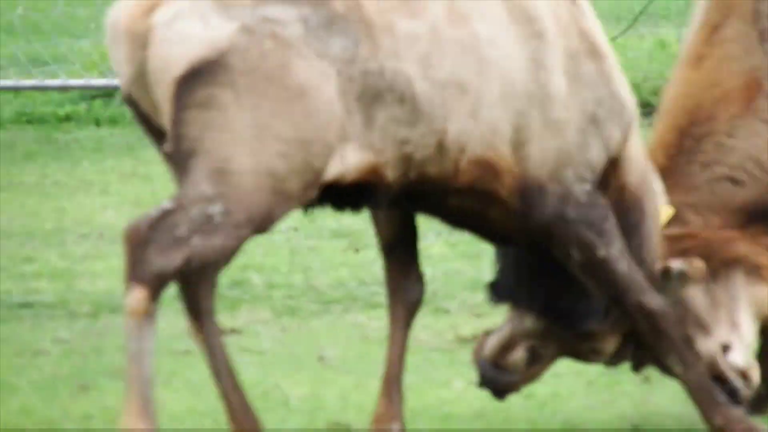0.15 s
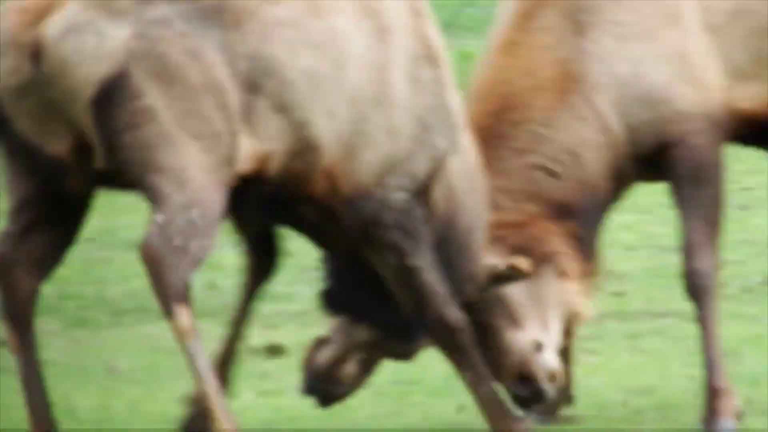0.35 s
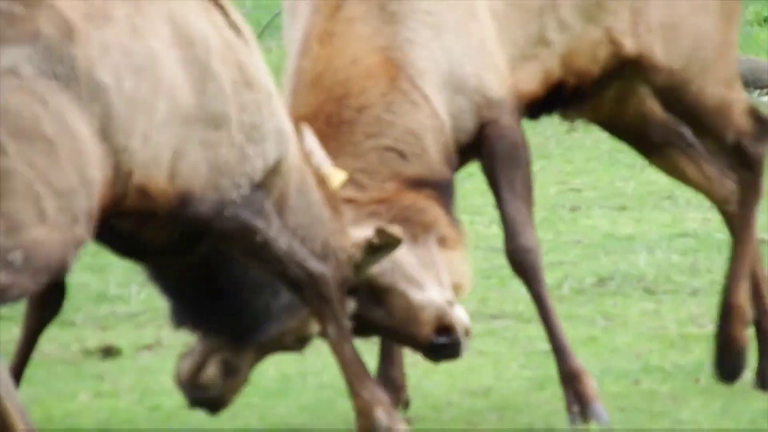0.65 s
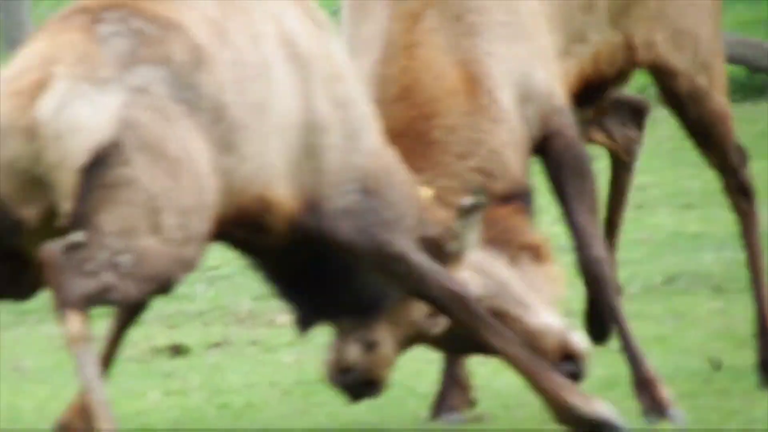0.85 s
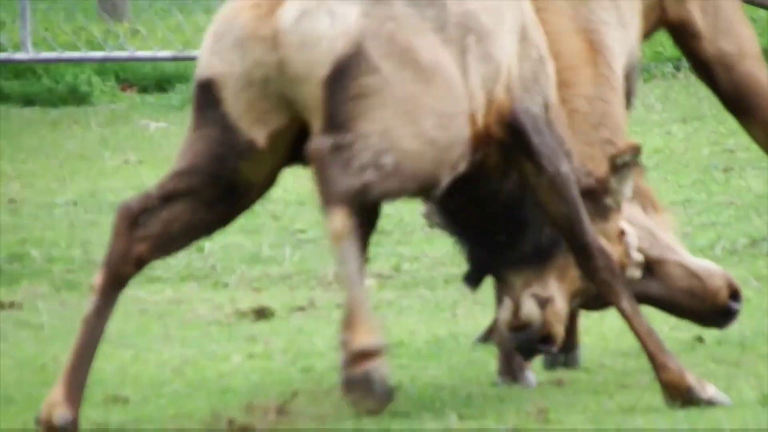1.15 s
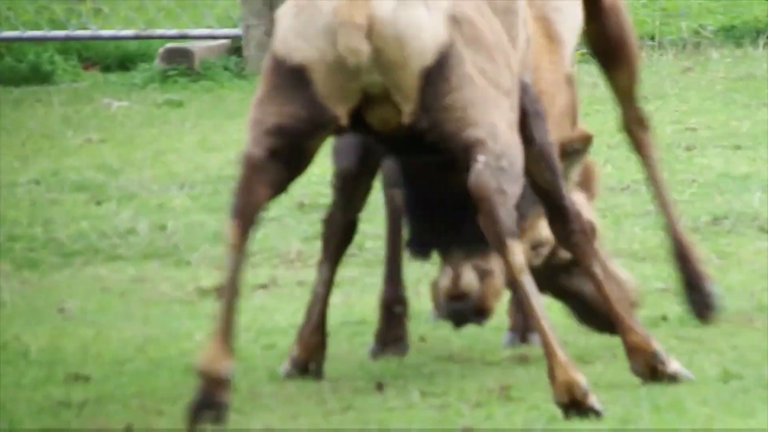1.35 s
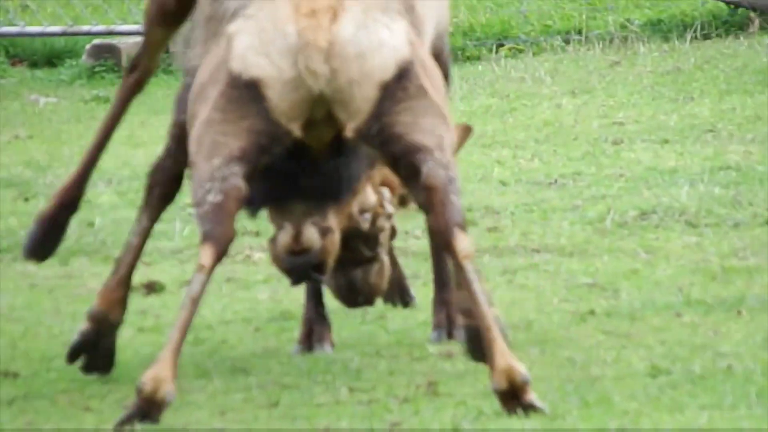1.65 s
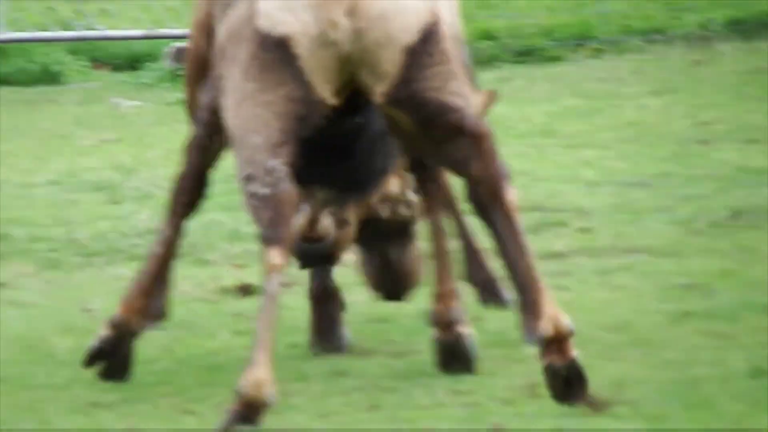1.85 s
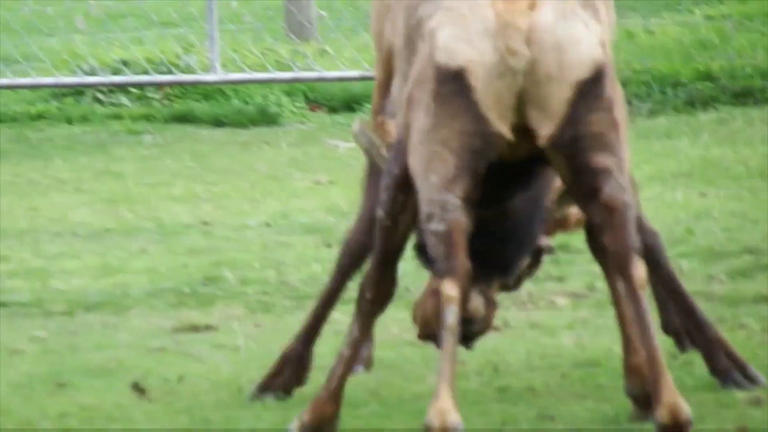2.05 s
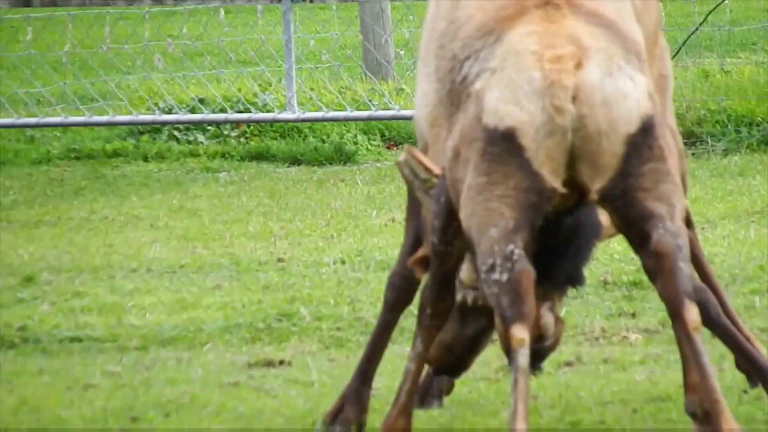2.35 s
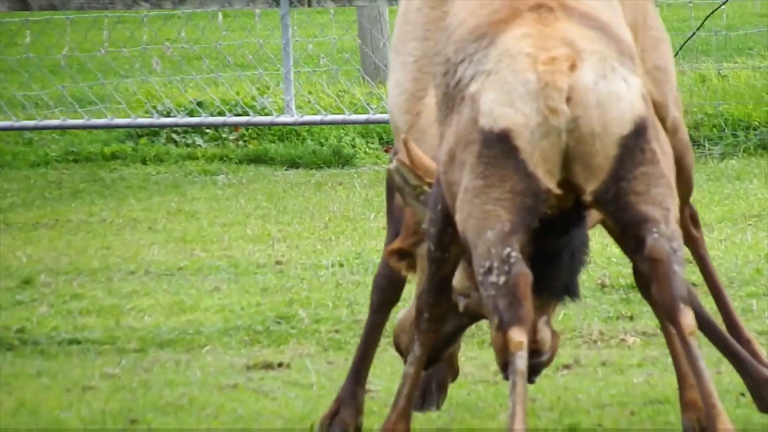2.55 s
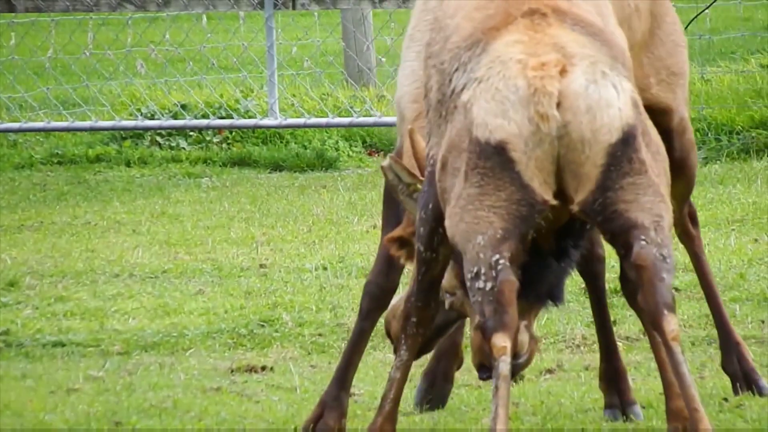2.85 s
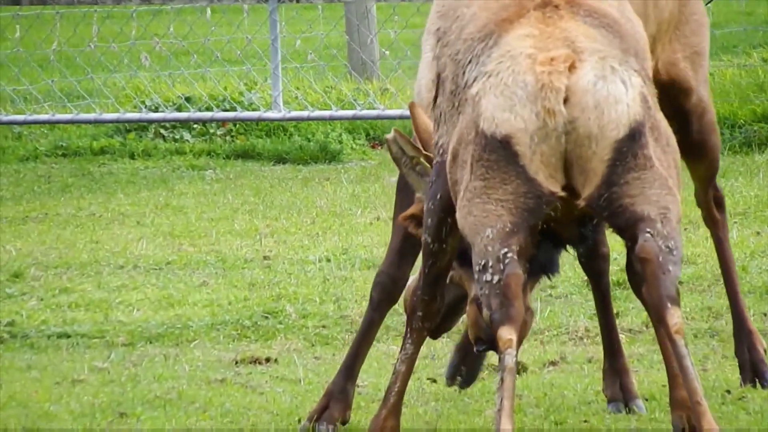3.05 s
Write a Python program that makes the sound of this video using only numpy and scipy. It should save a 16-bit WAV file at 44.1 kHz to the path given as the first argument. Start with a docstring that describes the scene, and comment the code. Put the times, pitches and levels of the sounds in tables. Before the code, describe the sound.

Irregular sharp, woody clacks of two young elk locking antlers, with brief rattles and scrapes, amid birdsong and soft mechanical ticking close by.

```python
"""Young elk locking antlers

Two young bull elk push with locked antlers in a paddock while small birds chirp in the trees.
Knocks and a clack are sets of ringing tones; scrapes, whirr and far-off twitter are shaped noise.
Bird calls are near-pure tones with moving pitch, followed by an echo. Light double ticks run over the whirr.
After a last sharp clack the ticking stops and the whirr turns thinner and faster."""
import sys
import numpy as np
from scipy import signal
from scipy.fft import rfft, irfft
from scipy.io import wavfile

SR = 44100
rng = np.random.default_rng(int(sys.argv[2]) if len(sys.argv) > 2 else 0)


def output_pcm(signal):
    """Save a mono or channel-first signal as 16-bit PCM at the path in sys.argv[1].

    Samples are clipped to [-1, 1] before scaling.
    """
    pcm = np.clip(np.atleast_2d(signal).T, -1, 1) * 32767
    wavfile.write(sys.argv[1], SR, np.round(pcm).astype(np.int16))


N = 278712
TIME = np.arange(N) / SR
BINS = np.fft.rfftfreq(N, 1 / SR)

# Level of the distant birds, which blur into a twitter: (time [s], level before a shared trim [dB])
TWITTER_LEVEL = [(0, -51.5), (0.42, -46), (1.0, -53.5), (1.65, -54.5), (1.92, -47), (2.15, -49),
                 (2.35, -54), (2.85, -52), (3.0, -49.5), (3.2, -48), (3.65, -52), (3.95, -57.5),
                 (4.3, -52.5), (4.55, -47), (4.85, -50), (6.32, -53.5)]
# Tone colour of that twitter: (frequency [Hz], relative level [dB])
TWITTER_COLOUR = [(1900, -30), (2400, -3), (2900, 2), (3400, 2), (3900, -6), (4500, -14), (6000, -34.5)]
# A faint far-off drone that comes and goes: (time [s], level [dB])
DRONE_LEVEL = [(0, -82), (0.15, -60), (0.35, -49.5), (0.6, -55.5), (0.95, -75), (2.8, -89), (3.1, -58),
               (3.6, -57.5), (4.0, -81), (6.32, -78)]
# Low hum bands: (frequency [Hz], width [Hz], level [dB])
HUM_BANDS = [(62.7, 4.6, -87.5), (167.8, 4.9, -79.5)]
# Tone colour of the steady hiss: (frequency [Hz], relative level [dB])
HISS_COLOUR = [(20, -6), (45, -13), (90, 10.5), (160, 11), (400, -6.5), (5000, 7.5), (9000, 4.5),
               (13000, 0.5), (16000, -6)]

# How alike the two sides of every noise are: (frequency [Hz], likeness [0 to 1])
SIDE_LIKENESS = [(60, 0.88), (110, 1), (200, 0.97), (380, 0.86), (700, 0.91), (1290, 0.95), (2380, 0.88),
                 (4400, 0.83), (8120, 0.65), (15000, 1)]
# Which side of the noise is louder: (frequency [Hz], left minus right [dB])
SIDE_LEAN = [(60, -1), (110, 0), (200, 1.5), (380, 1.5), (700, -1.5), (1290, 2), (2380, 0.5), (4400, 1),
             (8120, -1), (15000, 1)]
# How far the left side of the noise runs ahead: (frequency [Hz], phase lead [radians])
LEFT_LEAD = [(200, 0), (430, -0.22), (1000, 0.056), (3300, -0.014), (5500, 1), (8000, 0.12)]

# Tone colour of the whirr before the last clack: (frequency [Hz], relative level [dB])
SLOW_WHIRR_COLOUR = [(120, -34), (240, -10.5), (310, -7.5), (400, -2), (540, -9), (700, -1.5), (850, 0),
                     (1150, -8.5), (1550, -6.5), (1950, -10), (2500, -7), (3600, -30), (4600, -28),
                     (6500, -39)]
# Tone colour of the whirr after it: (frequency [Hz], relative level [dB])
FAST_WHIRR_COLOUR = [(120, -24.5), (250, -8), (350, -2), (560, -2.5), (740, -10), (1000, -1), (1170, -4),
                     (1340, 3.5), (1550, -6.5), (1750, 0), (2400, 3), (3500, -29), (4400, -14.5),
                     (6500, -21.5)]
# Thin whines above the fast whirr: (frequency [Hz], width [Hz], level [dB])
WHINES = [(6460, 350, -80), (7760, 410, -84), (10400, 1000, -74)]
SWITCH_S = 5.535  # when the whirr changes
# The loudest ticks: (time [s], level before a shared lift [dB])
LOUD_TICKS = [(0.613, -36.5), (0.844, -39.5), (1.18, -37), (1.3304, -35), (1.6636, -37.5), (1.8993, -37.5),
              (2.0313, -37), (2.264, -37), (2.348, -36.5), (3.6324, -39), (4.2323, -38.5), (4.5166, -33.5),
              (4.9167, -35), (5.119, -37)]
# What a tick rings with: (frequency [Hz], width [Hz], relative level [dB], right side's lead [radians])
TICK_MODES = [(409, 64, -2.5, -0.42), (720, 59, -1.5, 0.78), (975, 115, -3, 0.38), (1164, 77, -8, 0.54),
              (1423, 61, -2, 0.56), (1565, 54, -3, 1), (1877, 45, 4.5, -0.49), (2530, 250, -14.5, 0.49),
              (3264, 104, -6.5, -0.21), (3470, 99, -19, 0.58), (4150, 61, -9, -0.25),
              (4700, 280, -13, -1.9)]
STEP_HZ, FIRST_STEP_S = 59.94, 0.0122  # clock of the small motor that ticks

# A songbird repeats one phrase of arched notes:
# (time [s], length [s], top of the first arch [Hz], level of the first note [dB])
PHRASES = [(1.13, 0.17, 2950, -44.5), (1.696, 0.234, 3004, -42.5), (2.695, 0.26, 3067, -43),
           (3.449, 0.22, 2965, -41.5), (4.381, .255, 3110, -40), (5.155, 0.064, 3000, -39),
           (5.678, 0.2, 2966, -48.5)]
NOTE_S, NOTE_EVERY_S = 0.061, 0.07  # length and spacing of the notes in a phrase
ARCH_HZ = 475  # each note climbs this far to its top and falls back
NOTE_DROP_HZ, NOTE_FADE_DB = 65.5, -1.38  # each note is lower and softer than the one before
WARBLE_HZ, WARBLE_S = 290, 0.021  # opening warble of the later notes: depth, and time to settle
# Single sliding whistled notes, mostly from other birds; the one at 1.068 s is the songbird's lead note before
# its phrase: (time [s], length [s], start pitch [Hz], glide [Hz per s], warble depth [Hz], level [dB])
WHISTLES = [(0.105, .07, 2570, 6800, 5, -53), (0.418, 0.093, 3114, -2600, 35, -49.5),
            (1.019, 0.083, 3060, -1000, 5, -53.5), (1.068, 0.043, 2686, 800, 57, -46),
            (2.764, 0.057, 3436, -3600, 10, -45.5), (2.821, 0.123, 3366, -1800, 88, -49.5),
            (3.132, 0.043, 3436, -1700, 30, -44), (3.43, 0.029, 3350, -2200, 5, -44.5),
            (4.014, 0.084, 3085, -3800, 81, -48.5), (4.099, 0.047, 3650, -16000, 69, -50),
            (4.234, 0.046, 3290, -2400, 5, -47), (4.261, 0.066, 3085, -6600, 10, -48.5),
            (5.006, .059, 3380, -4500, 15, -46), (5.062, 0.103, 2925, -2100, 190, -45.5),
            (5.272, 0.034, 4260, -7500, 160, -58)]
# Short, high chips: (time [s], middle pitch [Hz], glide [Hz per s], level [dB])
CHIPS = [(1.057, 3630, -16000, -50), (1.06, 4800, -22000, -56), (1.662, 3650, 8000, -44),
         (2.455, 3580, 0, -54), (2.635, 3580, -30000, -51), (3.852, 3700, -5000, -48.5),
         (4.57, 3580, 0, -49), (5.332, 4480, 29992, -53.5)]
CHIP_S, CHIP_WARBLE_HZ = 0.0207, 50
# Fainter birds call at random times and pitches, each gliding up or down by a random amount
FAR_PER_S, FAR_DB, FAR_S = 4, -58.5, 0.054  # calls per second, level, length
FAR_LOW_HZ, FAR_HIGH_HZ = 2750, 3300
FAR_GLIDE_HZ_PER_S, FAR_WARBLE_HZ = 5930, 35  # largest glide, warble depth

# Rough sliding contacts around the knocks: (time [s], length [s], level at the start [dB])
SCRAPES = [(3.38, 0.027, -44), (5.006, 0.011, -35), (5.321, .15, -42.5), (5.547, 0.031, -43)]
# Tone colour of a scrape: (frequency [Hz], relative level [dB])
SCRAPE_COLOUR = [(88, -58), (150, -18), (396, -2), (726, -1), (1210, -11.5), (1600, -0.5), (2720, -6.5),
                 (3030, -33), (3320, -5.5), (5360, -22), (12000, -48), (15600, -74), (22000, -120)]
SCRAPE_RISE_S, SCRAPE_SAG_DB_PER_S, SCRAPE_RELEASE_S = 0.0035, -35, 0.0053

# Hard knocks and their rattles:
# (time [s], level [dB], brightness [dB per octave], left minus right [dB])
KNOCKS = [(3.2534, -11, -0.5, -2), (3.384, -29.5, -0.5, 6), (3.3859, -31.5, 1.5, 2), (3.3976, -29, 1.5, 0),
          (3.402, -27.5, 3, -6), (3.8087, -32, -0.5, -5), (3.8153, -39, -14, 2), (3.8235, -49, -2, -2),
          (4.0784, -21, -2, -1), (4.365, -17.5, -2, -4), (4.6098, -7.5, 1, -3), (5, -12, 2.5, -3.5),
          (5.0061, -28, 2, 14), (5.0088, -25, 9, 4), (5.0102, -26, 6, -4), (5.0156, -26, 2.5, 1),
          (5.5648, -27.5, -3, 1), (5.5701, -34.5, -7, -4), (5.58, -33.5, -18, 1)]
# What a knock rings with: (frequency [Hz], width [Hz], relative level [dB], right side's lead [radians])
BODY_MODES = [(190, 15, -8.5, -0.22), (263, 80, 2.5, -0.1), (344.5, 59, 6, -0.18), (403, 35, -3.5, -0.2),
              (515, 43, 4.5, -0.64), (706, 184, 5.5, 1.28), (899, 93, 3.5, 1.55), (1193, 33, -9.5, -0.12),
              (1344, 52, -1, -0.11), (1615, 41, 2, 1.8), (2030, 78, -7.5, 0.14), (2298, 123, 2.5, -1.64),
              (2665, 61, 2, -0.47), (2900, 140, -32, -0.4), (3380, 162, 0, -0.079), (3700, 210, -5, 1.2),
              (4110, 360, -25.5, 0.36), (4510, 120, -12, -1.5), (5270, 1700, -20, 1.8)]
# The quick contacts of the last, dry clack: (time [s], peak level [dB])
CLACKS = [(5.5305, -26), (5.537, -18), (5.5393, -28.5), (5.5411, -16.5), (5.5437, -35)]
# What that clack rings with: (frequency [Hz], width [Hz], relative level [dB], right side's lead [radians])
CLACK_MODES = [(398, 110, -12.5, 0.1), (1410, 200, -7, 0.99), (1850, 95, 3, 0.77), (2190, 135, 3.5, -0.72),
               (2660, 170, 2, -0.96), (3000, 160, -6, 0.94), (3225, 53, 7.5, 1.0), (4550, 140, -12, 0.93),
               (5150, 250, -24, -0.11), (6550, 290, -11, 1), (7770, 220, -20, 1), (10400, 1200, -37, 0)]

# Dips in the microphone's response: (frequency [Hz], width [Hz])
MIC_DIPS = [(220, 31), (1085, 90)]
EDGE_HZ = 15850  # top of the microphone's range


def amp(db):
    """Turns decibels into a plain multiplier."""
    return 10 ** (np.asarray(db) / 20)


def unit(x):
    """Scales a sound to an average (rms) strength of 1."""
    return x / np.sqrt(np.mean(x ** 2) + 1e-20)


def read(points, hz=BINS):
    """Reads between the rows of a frequency table, with octaves evenly spaced."""
    f, value = np.transpose(points)
    return np.interp(np.log(hz + 1), np.log(f + 1), value)


def level(rows):
    """Turns (time, dB) rows into a multiplier for every sample."""
    return amp(np.interp(TIME, *np.transpose(rows)))


def add(mix, s, sound):
    """Mixes a sound in at time s, cutting off what runs past the end."""
    part = mix[..., max(round(s * SR), 0):][..., :sound.shape[-1]]
    part += sound[..., :part.shape[-1]]


def drift(hz):
    """Smooth random motion of rms 1; a higher hz makes it quicker."""
    spectrum = rfft(rng.standard_normal(N))
    return unit(irfft(spectrum * np.exp(-(BINS / hz) ** 2), N))


def noise(colour_db, grain=1):
    """Stereo noise, roughened by a grain envelope and then given its tone colour."""
    first, second = rfft(rng.standard_normal((2, N)) * grain)
    same, lean = np.clip(read(SIDE_LIKENESS), -1, 1), read(SIDE_LEAN)
    # the right side is part shared noise, part its own, and lags by the left side's lead
    right = same * first + np.sqrt(1 - same ** 2) * second
    right = right * np.exp(-1j * read(LEFT_LEAD))
    sides = np.array([first * amp(lean / 2), right * amp(-lean / 2)])
    return unit(irfft(sides * amp(colour_db), N))


def hump(hz, width):
    """Tone colour in dB of a steep-sided resonance: strongest at hz, falling away on both sides."""
    return -20 * np.log10(1 + (2 * (BINS - hz) / width) ** 2)


def strike(modes, brightness_db, scatter_db, top_hz):
    """One blow: harder contact favours the high tones, and no two blows excite them alike."""
    t = np.arange(SR // 12) / SR
    out = np.zeros((2, len(t)))
    for k, (hz, width, db, lead) in enumerate(modes):
        size, detune = rng.standard_normal(2)
        octaves = np.log2(min(hz, 3500) / 700)
        gain = amp(db + brightness_db * octaves + scatter_db * size) * width
        side_phase = np.array([[-lead], [lead]]) / 2
        phase = 2 * np.pi * hz * (1 + 0.0011 * detune) * t + side_phase
        sign = (-1) ** (k // 2)
        # a wider resonance dies away sooner
        out += sign * gain * np.exp(-np.pi * width * t) * np.cos(phase)
    out = signal.lfilter(*signal.butter(2, 190, "high", fs=SR), out)
    # the contact takes a finite time, which softens the top
    out = signal.lfilter(*signal.butter(4, min(top_hz, 15000), fs=SR), out)
    return out / abs(out).max()


def echoes(x, t60):
    """Sparse, scattered reflections that die away by 60 dB in t60 seconds."""
    t = np.arange(SR) / SR
    hits = rng.standard_normal((3, SR)) * (rng.random((3, SR)) < 1500 / SR)
    taps = hits * amp(-60 * t / t60) * (t > 0.006)
    tail = taps[0] + 0.24 * taps[1:]  # mostly shared, partly different on each side
    return signal.fftconvolve(x, tail / np.linalg.norm(tail[0]), axes=1)[:, :N]


def background(twitter_db=-2, twitter_swing_db=1.5, hiss_db=-69):
    """Distant birds, a far drone, a low hum and an even hiss, all made of shaped noise."""
    swing = amp(twitter_db + twitter_swing_db * drift(25))
    twitter = swing * level(TWITTER_LEVEL) * noise(read(TWITTER_COLOUR))
    drone = level(DRONE_LEVEL) * noise(hump(1160, 330))
    hum = sum(amp(db) * noise(hump(hz, width)) for hz, width, db in HUM_BANDS)
    hiss = amp(hiss_db) * noise(read(HISS_COLOUR))
    return twitter + drone + hum + hiss


def whirr(slow_db=-51.5, fast_db=-50, flutter_hz=62, flutter_db=3, grain_db=2.0):
    """A grainy whirr that switches to a fast flutter with thin whines on top."""
    switched = np.clip((TIME - SWITCH_S) / 0.008, 0, 1)
    slow = amp(slow_db) * noise(read(SLOW_WHIRR_COLOUR), amp(grain_db * drift(108)))
    pace_hz = flutter_hz * (1 + 0.1944 * drift(31.6))
    flutter = amp(flutter_db * np.sin(2 * np.pi * np.cumsum(pace_hz) / SR))
    whine = sum(amp(db) * noise(hump(hz, width)) for hz, width, db in WHINES)
    fast_colour = read(FAST_WHIRR_COLOUR + [(11000, -45)])  # one more row keeps the treble falling
    fast = amp(fast_db) * noise(fast_colour, flutter) + whine
    return (1 - switched) * slow + switched * fast


def ticking(loud_db=1, small_db=-41, spread_db=3.0, rebound_s=0.004, slip_share=0.2):
    """Light double ticks on every second step of a motor's clock, now and then a step late."""
    out = np.zeros((2, N))
    slip, size = rng.random((190, 2)).T
    times = FIRST_STEP_S + np.cumsum(2 + (slip < slip_share)) / STEP_HZ
    sizes_db = small_db + spread_db * (3 * size - 2)
    small = [(s, db) for s, db in zip(times, sizes_db) if s < SWITCH_S]
    loud = [(s, db + loud_db) for s, db in LOUD_TICKS]
    for s, db in small + loud:
        for at in (s, s + rebound_s * rng.uniform(0.696, 1.3)):
            tick = strike(TICK_MODES, brightness_db=0.0, scatter_db=2.5, top_hz=5370)
            add(out, at, amp(db) * tick)
    return out


def whistle(hz, db):
    """A near-pure note that follows a pitch curve, with soft ends."""
    gate = signal.windows.tukey(len(hz), 0.15)
    return amp(db) * np.sqrt(2) * gate * np.sin(2 * np.pi * np.cumsum(hz) / SR)


def warble(t, rate_hz=62, uneven=0.314):
    """A quick, uneven shake of the pitch, between -1 and 1."""
    pace = np.interp(t, np.linspace(0, t[-1], num=8), rng.standard_normal(8))
    turns = np.cumsum(rate_hz * (1 + uneven * pace)) / SR
    return np.sin(2 * np.pi * (rng.random() + turns))


def glide(length, start_hz, hz_per_s, warble_hz, db):
    """A call that slides straight up or down and warbles on the way."""
    t = np.arange(round(length * SR)) / SR
    return whistle(start_hz + hz_per_s * t + warble_hz * warble(t), db)


def songbird(waver_hz=12, stop_s=0.0019):
    """Each phrase is one clean arch, then warbled arches that sink and fade until the bird breaks off."""
    out, t = np.zeros(N), np.arange(round(NOTE_S * SR)) / SR
    arch = -ARCH_HZ * (2 * t / NOTE_S - 1) ** 2
    for s, length, top_hz, db in PHRASES:
        for k in range(4):
            start = k * NOTE_EVERY_S
            depth = waver_hz + (k > 0) * WARBLE_HZ * np.exp(-(t / WARBLE_S) ** 2)
            hz = top_hz - k * NOTE_DROP_HZ + arch + depth * warble(t)
            singing = np.clip((length - start - t) / stop_s, 0, 1)
            add(out, s + start, singing * whistle(hz, db + k * NOTE_FADE_DB))
    return out


def birds(flicker_db=2.0, balance_db=1.24):
    """The songbird, sliding whistles, chips and faint far calls, all flickering a little in level."""
    flicker, out = amp(flicker_db * drift(110)), songbird()
    for s, *call in WHISTLES:
        add(out, s, glide(*call))
    for s, middle_hz, hz_per_s, db in CHIPS:
        start_hz = middle_hz - hz_per_s * CHIP_S / 2
        add(out, s, glide(CHIP_S, start_hz, hz_per_s, CHIP_WARBLE_HZ, db))
    for when, pitch, slope in rng.random((round(FAR_PER_S * N / SR), 3)):
        hz = FAR_LOW_HZ + pitch * (FAR_HIGH_HZ - FAR_LOW_HZ)
        hz_per_s = FAR_GLIDE_HZ_PER_S * (2 * slope - 1)
        add(out, when * N / SR, glide(FAR_S, hz, hz_per_s, FAR_WARBLE_HZ, FAR_DB))
    return out * flicker * amp([[balance_db], [-balance_db]])  # left up, right down


def scrape(grain_db=4):
    """Dense small slips of two rough surfaces: each slide bites quickly, eases off and lets go."""
    pressure = np.zeros(N)
    for s, length, db in SCRAPES:
        t = TIME - s
        rise = np.minimum(t, 0) / SCRAPE_RISE_S
        release = np.maximum(t - length, 0) / SCRAPE_RELEASE_S
        sag_db = SCRAPE_SAG_DB_PER_S * np.clip(t, 0, length)
        pressure += np.exp(rise - release) * amp(db + sag_db)
    return pressure * noise(read(SCRAPE_COLOUR), amp(grain_db * drift(270)))


def crack(t60=0.05, low_hz=5000):
    """The brief, bright grit of two hard surfaces meeting: a fading burst of high noise."""
    t = np.arange(SR // 25) / SR
    grit = rng.standard_normal((2, len(t))) * amp(-60 * t / t60)
    return signal.lfilter(*signal.butter(1, [low_hz, 9000], "band", fs=SR), grit)


def knocks(crack_db=-39):
    """Hollow knocks that all ring the same body, and one drier, brighter clack near the end."""
    out = np.zeros((2, N))
    for s, db, brightness_db, pan_db in KNOCKS:
        sides = amp(db + np.array([[pan_db], [-pan_db]]) / 2)
        add(out, s, sides * strike(BODY_MODES, brightness_db, scatter_db=2, top_hz=5200))
        add(out, s, sides * amp(crack_db + brightness_db) * crack())
    for s, db in CLACKS:
        add(out, s, amp(db) * strike(CLACK_MODES, brightness_db=1.5, scatter_db=5.5, top_hz=8700))
    return out


def scene(echo_db=-9, knock_echo_db=-19):
    """Near knocks have only a brief tail; the birds carry the echo of the trees."""
    blows, song = knocks(), birds()
    song_tail = amp(echo_db) * echoes(song, t60=0.71)
    knock_tail = amp(knock_echo_db) * echoes(blows, t60=0.14)
    return background() + whirr() + ticking() + song + song_tail + scrape() + blows + knock_tail


def record(dry):
    """Two narrow dips of the microphone, then its upper limit."""
    for hz, width in MIC_DIPS:
        dry = signal.lfilter(*signal.iirnotch(hz, hz / width, SR), dry)
    limit = signal.firwin(511, EDGE_HZ, window=("kaiser", 9), fs=SR)
    return signal.oaconvolve(dry, limit[None], "same")


dry = scene()
out = record(dry)
output_pcm(out)
```